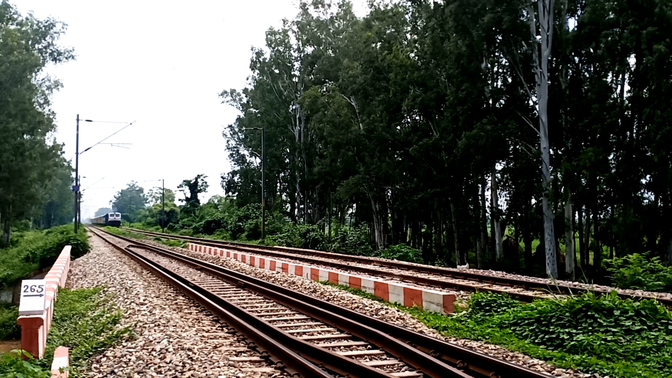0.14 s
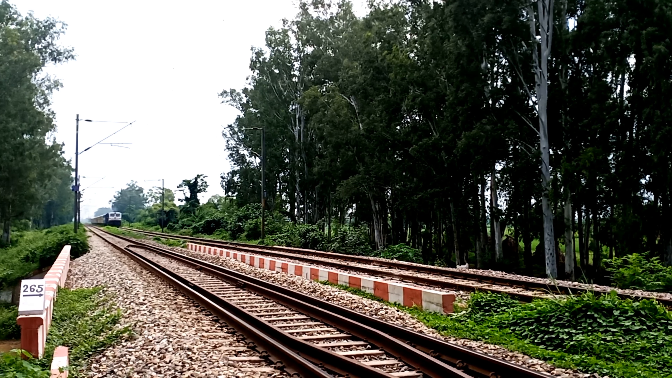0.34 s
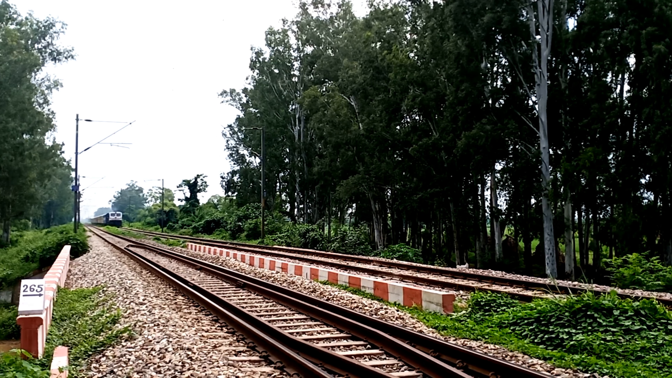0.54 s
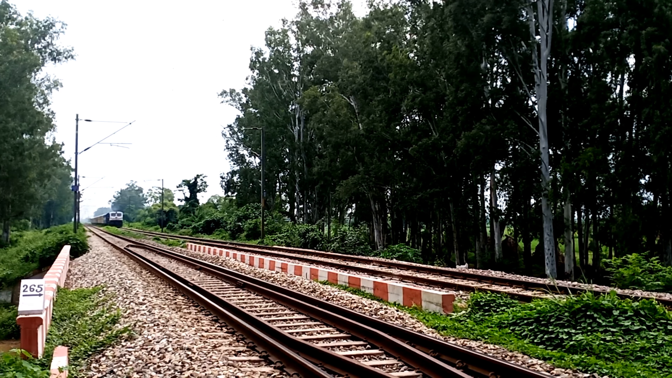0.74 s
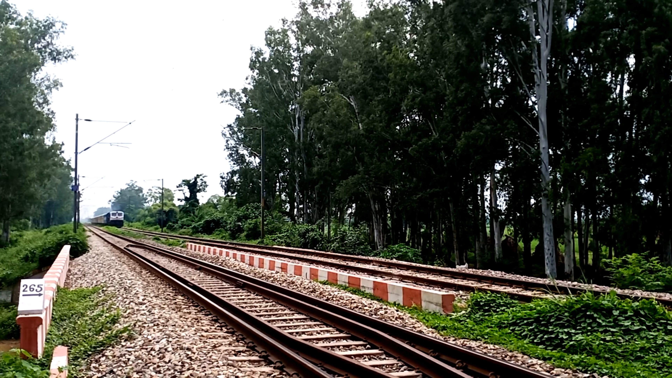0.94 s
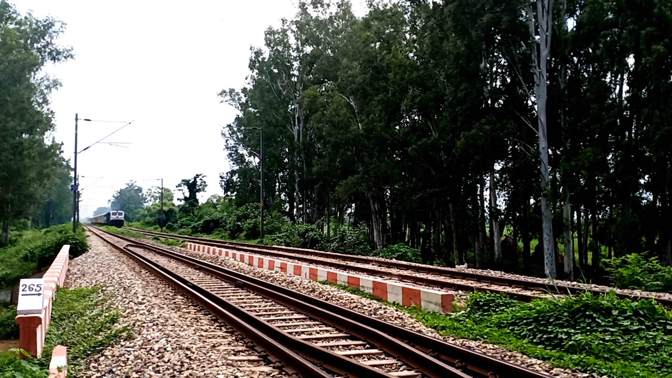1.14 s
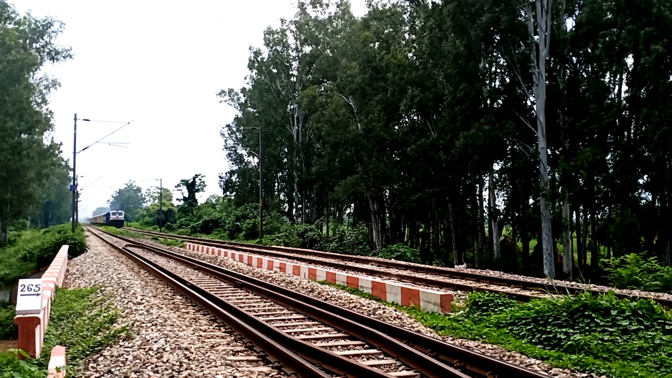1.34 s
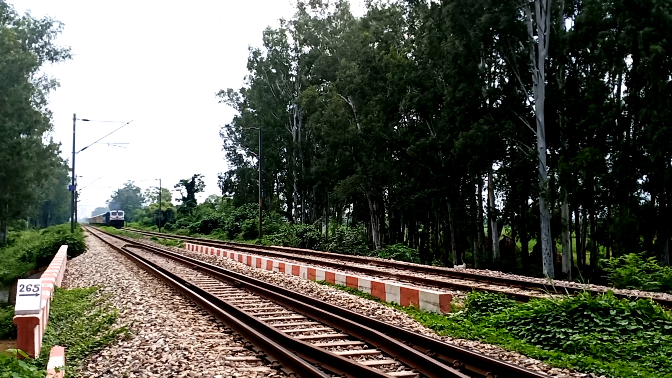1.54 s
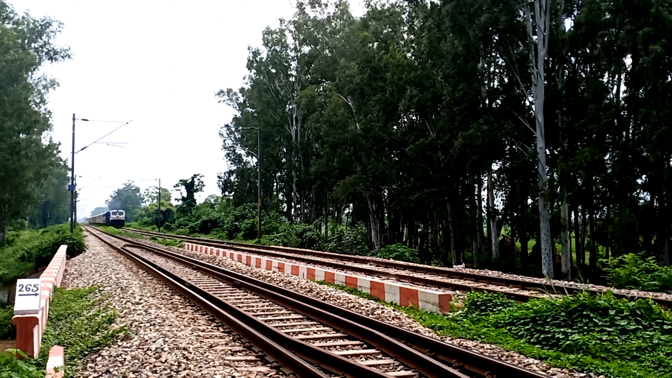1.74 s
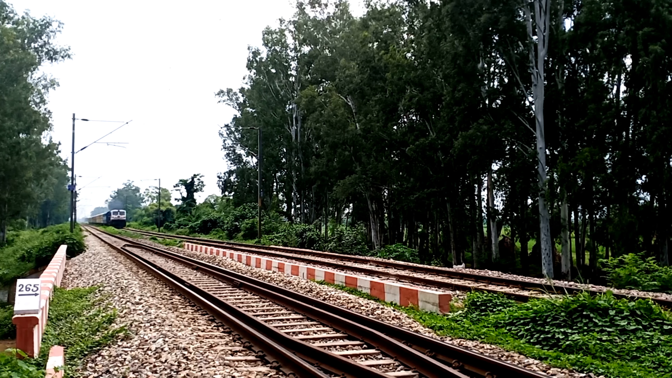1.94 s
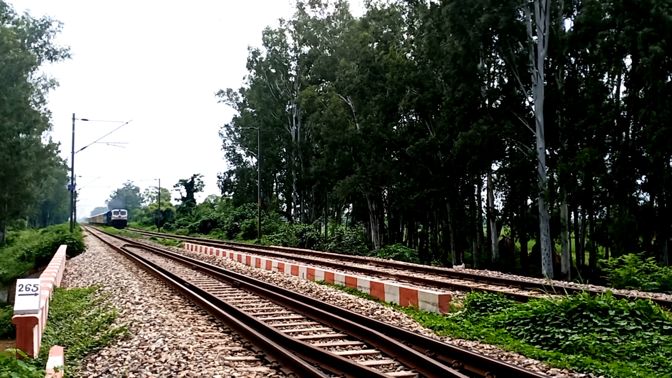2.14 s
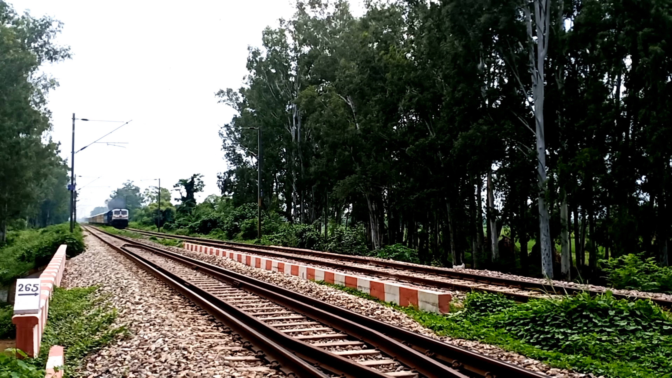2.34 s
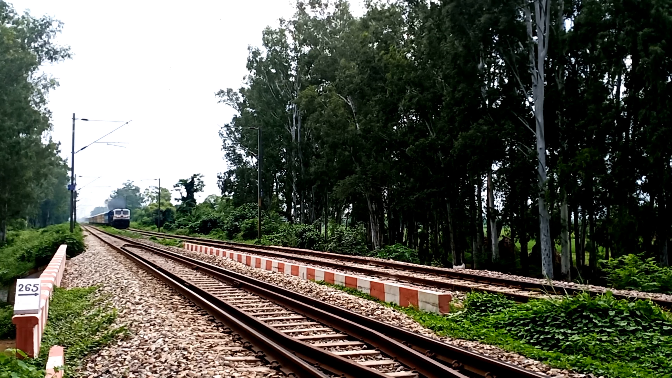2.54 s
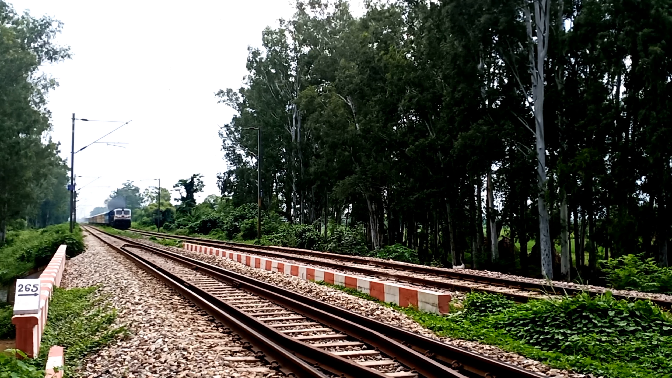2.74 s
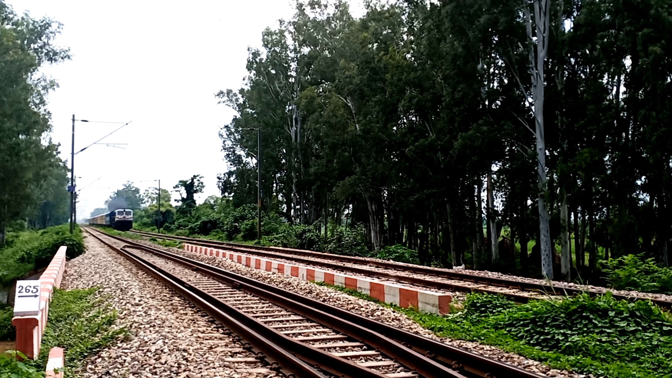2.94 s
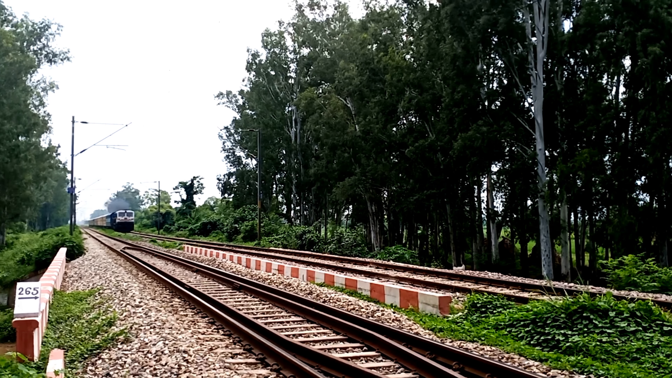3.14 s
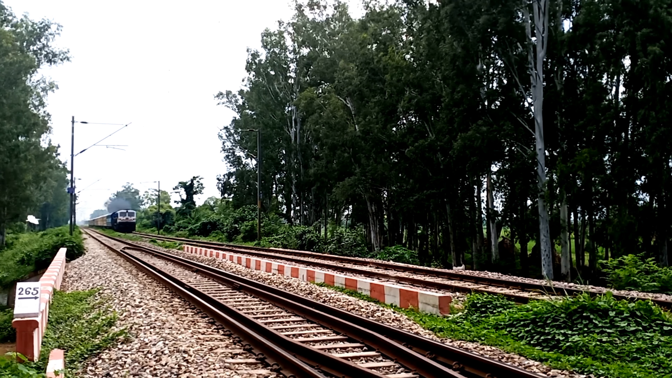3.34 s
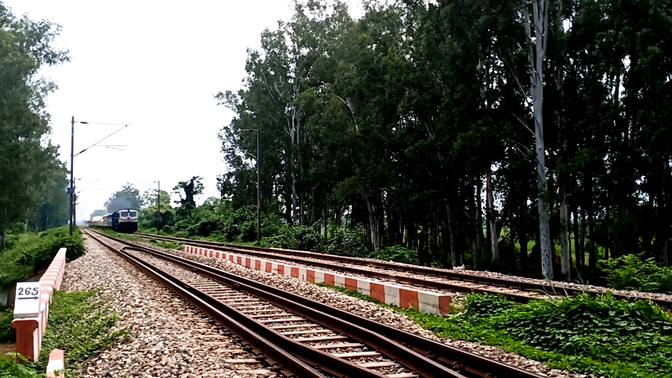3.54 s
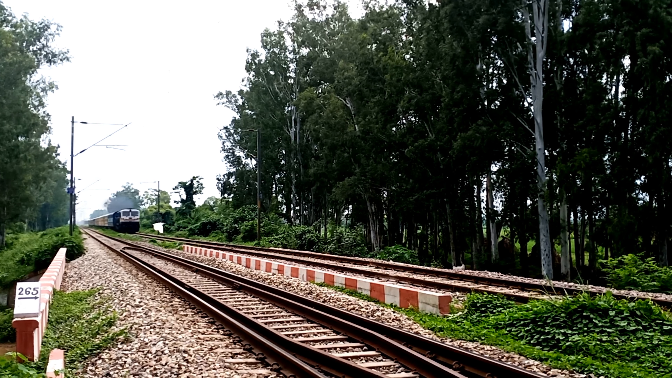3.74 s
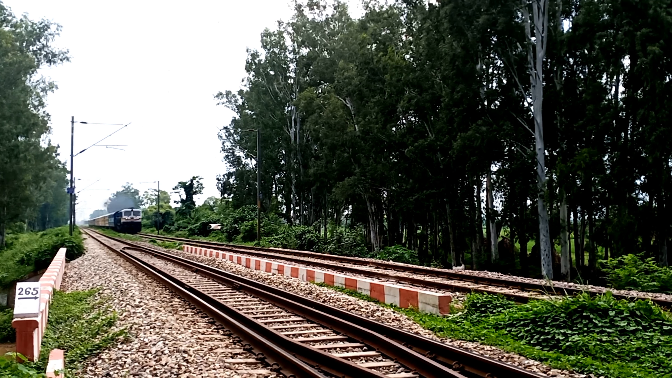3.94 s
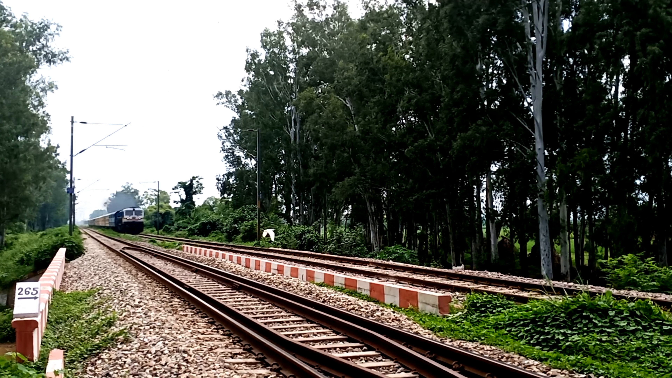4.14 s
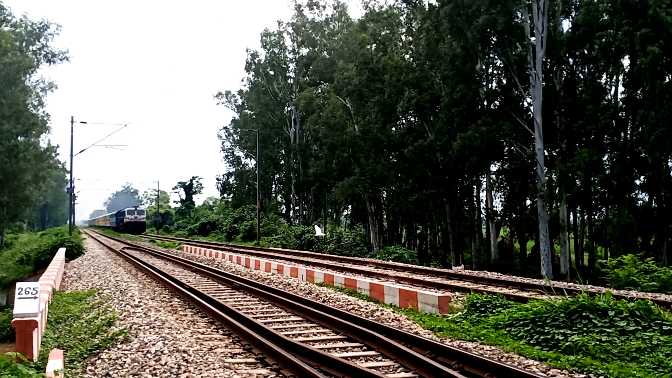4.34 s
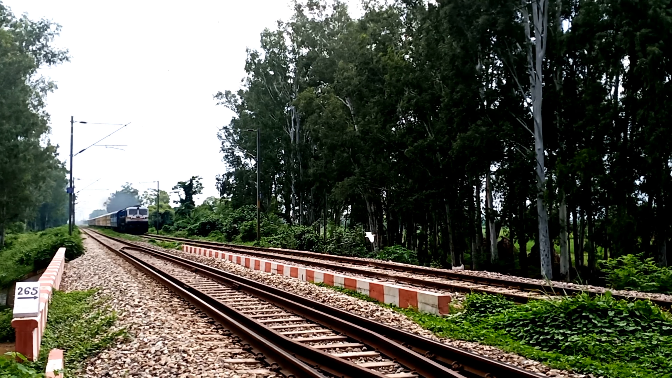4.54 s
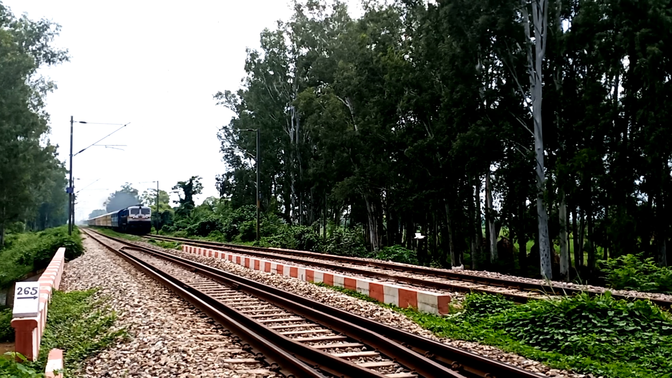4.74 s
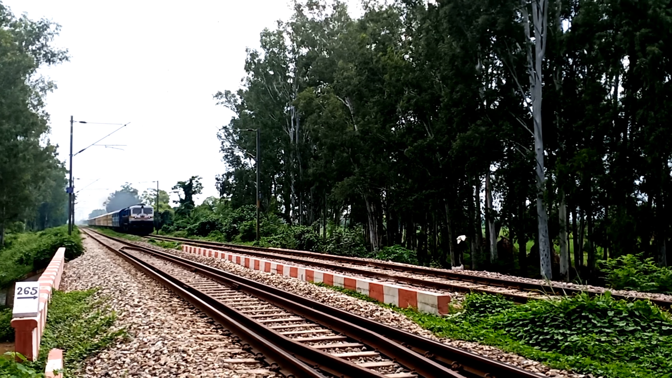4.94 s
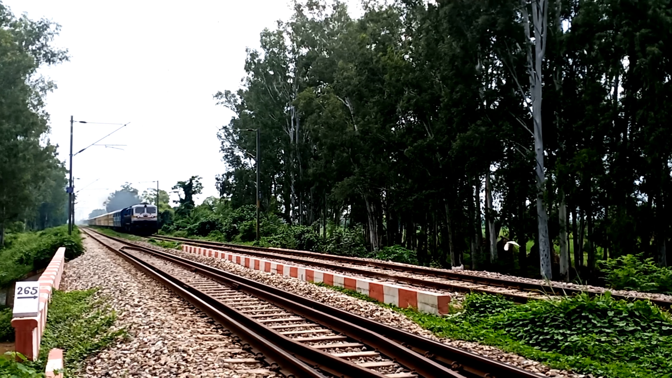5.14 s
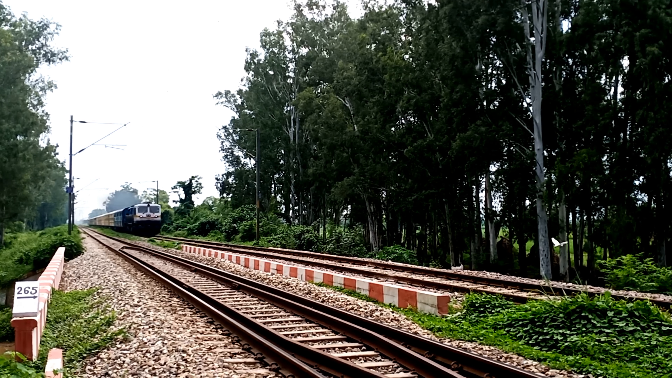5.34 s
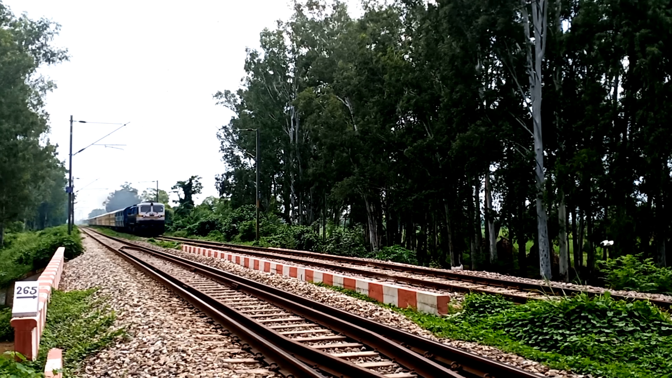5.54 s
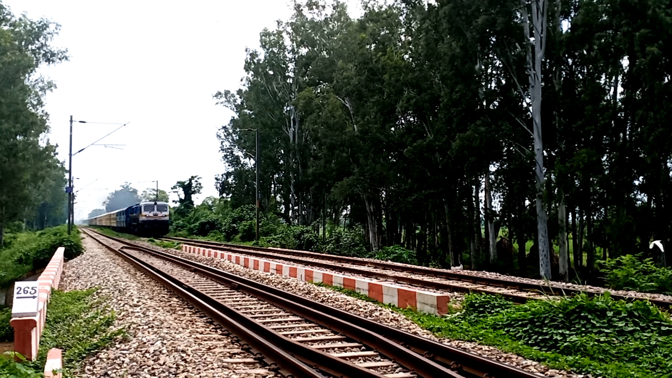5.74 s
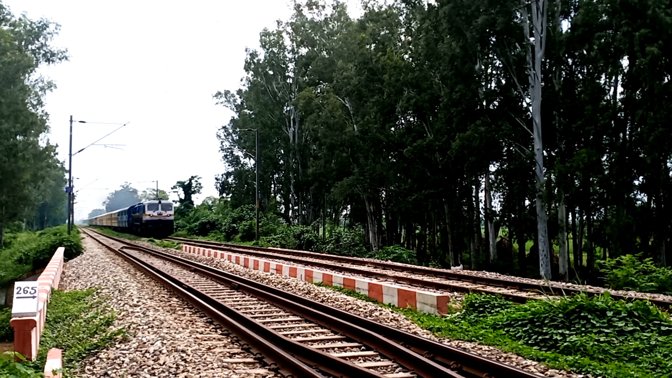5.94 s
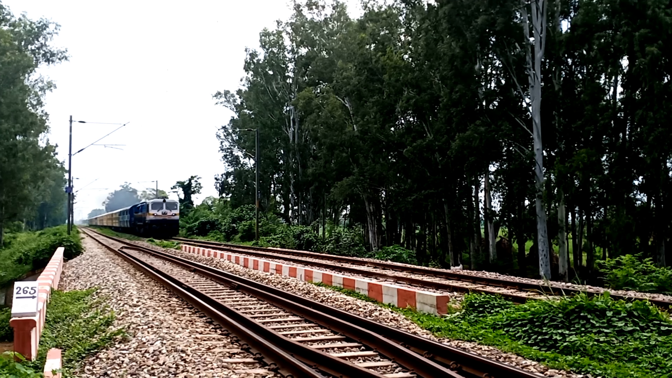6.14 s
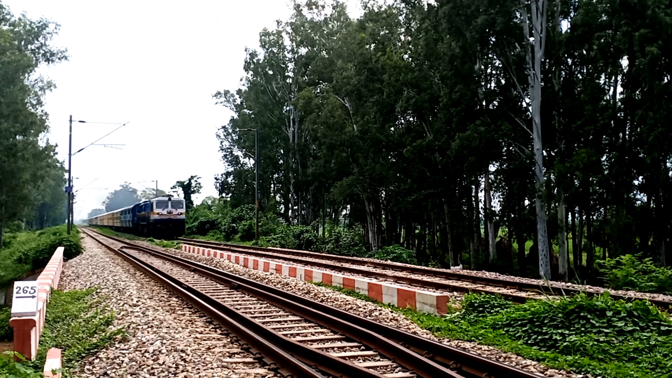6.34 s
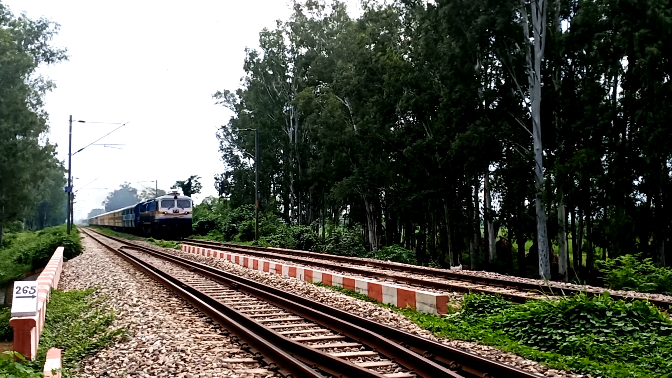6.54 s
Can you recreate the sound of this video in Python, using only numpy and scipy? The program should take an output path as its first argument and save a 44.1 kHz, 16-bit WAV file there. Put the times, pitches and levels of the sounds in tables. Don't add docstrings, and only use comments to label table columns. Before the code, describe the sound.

Faint rumble, thin rail whistles and soft insects give way to a piercing flange squeal and the growing roar of an oncoming diesel locomotive.

```python
import sys
import numpy as np
from scipy import signal
from scipy.io import wavfile
from scipy.ndimage import uniform_filter1d

SR = 44100
rng = np.random.default_rng(int(sys.argv[2]) if len(sys.argv) > 2 else 0)


def wav_record(signal):
    frames = np.transpose(np.atleast_2d(signal))
    bounded = np.clip(frames, -1, 1)
    quanta = np.round(bounded * 32767).astype(np.int16)
    wavfile.write(sys.argv[1], SR, quanta)


def makeup_ratio(level_db):
    decades = np.asarray(level_db, float) / 20
    return 10 ** decades


N = 291060
T = np.arange(N) / SR

# (time [s], level against that at 4.9 s [dB])
NEARNESS = [(0, -24), (.66, -22.5), (1.1, -19), (1.45, -18.5), (1.6, -17), (2.2, -12.5), (2.6, -7),
            (3.3, -5), (4.0, -2), (4.9, 0), (5.5, 1.5), (6.3, 3.5), (6.6, 4)]


def evened(x):
    return x / np.sqrt(np.mean(abs(x) ** 2, -1, keepdims=True) + 1e-20)


def columns(rows, t):
    s, *values = np.transpose(rows)
    return np.array([np.interp(t, s, v) for v in values])


def read(points, hz):
    f, *values = np.transpose(points)
    return np.array([np.interp(np.log(hz + 1), np.log(f + 1), v) for v in values])


def sides(pan_db):
    return makeup_ratio(np.array([[pan_db / 2], [-pan_db / 2]]))


def flutter(length, width_hz, same, order=2):
    a, b, c, d = rng.standard_normal((length + 4000, 4)).T
    same = np.clip(same, 0, 1)
    left = a + 1j * b
    z = np.array([left, same * left + np.sqrt(1 - same ** 2) * (c + 1j * d)])
    pole = np.exp(-np.pi * width_hz / SR)
    for _ in range(order):
        z = signal.lfilter([1 - pole], [1, -pole], z)
    return evened(z[:, 4000:])


def turning(hz):
    return np.exp(2j * np.pi * np.cumsum(hz) / SR)


def drift(rate_hz):
    speeds = np.geomspace(.3, rate_hz, num=8)[:, None]
    coarse = T[::441]
    swing = np.sin(2 * np.pi * (speeds * coarse + rng.random((8, 1)))).sum(0) / 2
    return np.interp(T, coarse, swing)


def swells(rows, t):
    coarse = t[::88]
    bells = sum(db * np.exp(-abs((coarse - s) / half_s) ** 3.7) for s, half_s, db in rows)
    return np.interp(t, coarse, bells + 0 * coarse)


def layers_db():
    # (level against the near spectra [dB], growth [dB per dB of nearness], random swing [dB])
    layers = [
        (-7.5, 0.55, 1),
        (2.5, .7, 2.17),
        (2.5, 1.37, 0.8),
        (0, 1.13, 0.33),
    ]
    # (middle [s], half length [s], level [dB])
    gusts = [
        [(.8, .12, -8.5), (1.14, 0.072, 6), (1.55, 0.13, 3.5), (2.65, 0.18, -1), (4.9, 0.11, 4),
         (2.12, 0.2, -8.5), (3.58, .04, -11), (4.37, .12, 2), (4.63, .08, -2)],
        [(2.81, 0.1, 11), (2.7, 0.052, 5), (3.1, .03, 3.5), (2.1, 0.24, -6.5), (4, 0.34, 2.5), (4.7, 0.063, -5),
         (2.1, .12, -3.5)],
        [(.45, .35, 7.5), (.97, 0.075, -4), (2.61, 0.034, 2), (3.23, 0.02, 6), (3.5, .12, -3)],
        [],
    ]
    near_db = columns(NEARNESS, T)[0]
    out = []
    for (db, growth, swing_db), layer_gusts in zip(layers, gusts):
        swing = swing_db * (1 - near_db / 30) * drift(rate_hz=7.)
        out.append(db + growth * near_db + swells(layer_gusts, T) + swing)
    out = np.array(out)
    screen_db, clear_s, clearing_s = -12, 3.25, 0.12
    out[1] += screen_db / 2 * (1 - np.tanh((T - clear_s) / clearing_s))
    return out


def exhaust(noise_db):
    # (time [s], speed [turns per second])
    crank = [(0.0, 16.85), (0.55, 16.84), (1.1, 16.88), (1.65, 16.63), (2.2, 16.55), (2.75, 16.61),
             (3.3, 16.81), (3.85, 17.0), (4.4, 17.03), (4.95, 16.98), (5.5, 16.77), (6.05, 16.84),
             (6.6, 16.81)]
    main_orders = (8, 9, 10, 13)
    # (multiple of crank speed, level against the noise layer they ride on [dB])
    weak_orders = [(3, -16), (4, 5), (5, 4.5), (6, 5.5), (7, -0.5), (11, 4.5), (12, -15), (14, -36),
                   (15, -6), (16, -6.5), (17, -1), (18, 4.5), (19, -27), (20, -8), (22, -2), (23, -5),
                   (25, 2.5)]
    # (middle [s], half length [s], level [dB])
    fades = [
        [(.48, 0.44, -19), (1.98, 0.31, -28), (2.96, 0.34, -11.5), (4.5, 0.28, -12.5), (4.5, .07, -24),
         (5.37, 0.17, -3.5), (5.82, 0.19, -6.5), (6.14, 0.068, -17)],
        [(.08, 0.11, -8), (.86, .22, -10), (2.08, 0.255, -22), (2.55, 0.12, -5), (2.98, 0.26, -16),
         (3.68, 0.11, -8), (4.52, 0.11, -8.5), (5.05, 0.17, -1), (5.7, 0.092, -28.5), (5.9, 0.23, -12),
         (6.27, 0.038, -5), (6.47, 0.084, -3.5)],
        [(.72, 0.35, -15), (1.9, 0.46, -18), (3.1, 0.45, -10.5), (4.27, 0.17, -15), (4.95, 0.47, -10),
         (5.8, 0.22, -9)],
        [(3.7, 0.13, 17.5), (5.1, 0.081, 13), (5.55, .13, 15.5), (6.3, 0.52, 11.5)],
    ]
    main_orders_db = (-25, -31, -33.5, -54.5)
    growth = 0.78
    turns = np.cumsum(columns(crank, T)[0]) / SR - .2
    rumble_db = noise_db[0] - 30.5
    body_db = 1.15 * noise_db[1] - 42.5
    near_db = columns(NEARNESS, T)[0]
    levels = []
    for order, db, order_fades in zip(main_orders, main_orders_db, fades):
        levels.append((order, db + growth * near_db + swells(order_fades, T) + 1.1 * drift(rate_hz=9.)))
    for order, db in weak_orders:
        carrier_db = rumble_db if order < 8 else body_db
        levels.append((round(order), db - 14.0 + carrier_db + 3.8 * drift(rate_hz=6.)))
    tone = 0
    for order, db in levels:
        pipe_lag = np.arctan((order - 8) / 1.2)
        air_lag = (.25 + .2 * abs(order - 9)) * drift(rate_hz=1.5)
        wave = np.cos(2 * np.pi * order * turns - (pipe_lag + air_lag))
        tone = tone + makeup_ratio(db) * np.sqrt(2) * wave
    return tone * sides(1.77)


def roar(noise_db):
    layer_hz = (90, 350, 850, 2600)
    # (frequency [Hz], level [dB per Hz])
    near_left = [(25, -120), (65, -51.5), (140, -53.5), (300, -62), (540, -68.5), (800, -63.5), (1150, -66),
                 (2200, -62), (3100, -63), (4400, -59.5), (6500, -68), (8200, -82.5), (8900, -86),
                 (13600, -86.5), (15600, -70)]
    # (frequency [Hz], level [dB per Hz])
    near_right = [(200, -73.5), (300, -63), (540, -73), (900, -64), (1250, -70), (2300, -65.5),
                  (3500, -69.5), (6000, -74.5), (9800, -78), (10300, -94), (13500, -94), (15600, -88)]
    # (frequency [Hz], left [dB per dB], right [dB per dB])
    range_growth = [(200, 0.9, 1.14), (630, 1.28, 1.14), (900, 0.5, 1.14), (1150, 1.27, 1.1),
                    (1420, 0.77, 1.27), (2050, 1.05, 1.1), (2750, 1.1, 1.46), (4140, 0.86, 1.37),
                    (6670, 0.98, 1.35), (9050, 1.57, 1.5), (15200, 2, 2.2)]
    # (frequency [Hz], likeness [-1 to 1])
    coherence = [(60, 0.98), (130, 0.83), (290, 1), (640, 0.67), (1410, -0.22), (3100, 0.19),
                 (6820, 0.0014), (15000, 0.31)]
    # (frequency [Hz], width [Hz], level [dB])
    body_rings = [
        (719, 64, 8),
        (976, 114, 9),
        (1420, 93, 4.5),
        (2260, 250, 4),
    ]
    frames = N // 256 + 5
    hz = np.fft.rfftfreq(1024, 1 / SR)
    t = np.arange(frames) * 256 / SR
    a, b, c, d, patches, flicker, wisps = rng.standard_normal((frames, 513, 7)).T
    wisps = evened(uniform_filter1d(uniform_filter1d(wisps, size=3, axis=0), size=30, axis=1))
    patches = evened(uniform_filter1d(uniform_filter1d(patches, size=12, axis=0), size=14, axis=1))
    flicker = evened(uniform_filter1d(uniform_filter1d(flicker, size=90, axis=0), size=4, axis=1))

    change_db = np.array([np.interp(t, T, db) for db in noise_db])
    change_db = np.array([np.interp(np.log(hz + 1), np.log(layer_hz), c_db) for c_db in change_db.T]).T
    mottle_db = np.clip(-change_db / 7, .6, 3) * wisps
    near_db = np.vstack([read(near_left, hz), read(near_right, hz)])
    near_db[1, hz < 200] = near_db[0, hz < 200] - 1.5
    near_db = near_db + sum(db / (1 + (2 * (hz - f) / width) ** 2) for f, width, db in body_rings)

    same = np.clip(read(coherence, hz)[0], -1, 1)[:, None]
    left = a + 1j * b
    z = np.array([left, same * left + np.sqrt(1 - same ** 2) * (c + 1j * d)])
    growth_db = read(range_growth, hz)[..., None] * change_db
    z *= makeup_ratio(near_db[..., None] + growth_db + 0.91 * patches + 0.41 * flicker + mottle_db)
    return signal.istft(z, nperseg=1024, noverlap=768)[1][:, :N] * np.sqrt(SR / 1024)


def whines():
    # (time [s], low whine [Hz], middle whine [Hz], high whine [Hz])
    whine_hz = [(0, 798, 947, 1410), (.5, 781.5, 972, 1412), (2.2, 780, 968, 1420), (3.3, 792, 983, 1415),
                (4.4, 805, 989, 1396), (5.5, 793, 999, 1415), (6.6, 788, 995, 1405)]
    # (rms when near [dB], growth [dB per dB of nearness])
    whine_levels = [
        (-37, 1.03),
        (-45.5, 1.07),
        (-49.5, 0.5),
    ]
    # (middle [s], half length [s], level [dB])
    whine_swells = [
        [(.42, 0.21, 13), (.98, .07, -17), (1.15, 0.049, 10), (1.36, .05, -6), (2.55, 0.063, 5.5),
         (3.23, 0.069, 6.5), (3.5, .12, -8), (5.55, 0.095, -1.5), (6.25, 0.17, -5)],
        [(.27, .07, 17), (1.3, 0.11, 3), (3.4, 0.17, 3), (5.07, 0.073, 6), (6.1, 0.64, 7.5)],
        [(.45, 0.83, 9.5), (1.7, .45, -2), (2.77, .12, 6), (6.23, .12, -10)],
    ]
    widths_hz, pans_db, likeness = (42, 6, 60), (3.5, .6, 3.), (.9, .85, .1)
    near_db = columns(NEARNESS, T)[0]
    levels_db = [db + growth * near_db + swells(rows, T) + 1.2 * drift(rate_hz=5.)
                 for (db, growth), rows in zip(whine_levels, whine_swells)]
    out = np.zeros((2, N))
    for db, hz, width, pan, same in zip(levels_db, columns(whine_hz, T), widths_hz, pans_db, likeness):
        wobble = 7.2 / width + flutter(N, width, same)
        out += makeup_ratio(db + 1.5) * (evened(wobble) * turning(hz)).real * sides(pan)
    return out


def insects():
    # (frequency [Hz], width [Hz], level [dB], left minus right [dB], throbs [per second])
    choruses = [
        (5270, 350, -62.5, 0.5, 12),
        (9320, 630, -75, -15.5, 55),
    ]
    out = np.zeros((2, N))
    for hz, width_hz, db, pan_db, throbs_hz in choruses:
        throb = 1 + 0.14 * np.sin(2 * np.pi * throbs_hz * T + 2. * drift(rate_hz=1.4))
        song = (flutter(N, width_hz, 0.11) * turning(np.full(N, hz))).real
        out += 2 * makeup_ratio(db) * throb * song * sides(pan_db)
    return out


def squeaks():
    # (frequency [Hz], width [Hz], left minus right [dB])
    rail_modes = [(2490, 69, -7), (2860, 95, 3), (3120, 800, 12), (3210, 63, 3), (3390, 90, 7.5),
                  (3760, 73, 13), (7090, 150, 2), (7240, 180, 2), (7400, 180, -2), (11450, 370, 4)]
    # (start [s], end [s], level [dB])
    mode_squeaks = [
        [(.415, .62, -57.5), (.62, .86, -59)],
        [(.42, .56, -63), (.6, .9, -70), (.93, 1.3, -66)],
        [(0.654, .95, -59)],
        [(0.429, 1.12, -53.5)],
        [(.21, .36, -66), (.665, .92, -55), (1.11, 1.24, -60), (1.19, 1.4, -63), (1.97, 2.45, -55.5)],
        [(0.0062, .25, -68)],
        [(.21, .4, -63.5), (1.19, 1.37, -69)],
        [(1.76, 1.93, -67)],
        [(1.433, 1.65, -70)],
        [(1.409, 2.296, -72.5)],
    ]
    out = np.zeros((2, N))
    rows = [(*row, *mode) for mode, squeaks_here in zip(rail_modes, mode_squeaks) for row in squeaks_here]
    for start_s, end_s, db, hz, width_hz, pan_db in rows:
        start, end = max(round(start_s * SR), 0), round(end_s * SR)
        length = end - start
        share = np.linspace(0, 1, length)
        shape = np.minimum(share * length / 900, 1) * (1 - share ** 2.7)
        fuzz = evened(24.0 / width_hz + flutter(length, width_hz, 0.16))
        ring = fuzz * turning(np.full(length, hz))
        out[:, start:end] += 2.43 * makeup_ratio(db) * ring.real * shape * sides(pan_db)
    return out


def squeal_db(t):
    # (middle [s], half length [s], level [dB])
    grips = [(2.15, .025, 1.5), (3.18, 0.059, 1), (2.303, 0.012, 7.5), (2.34, 0.011, -13),
             (2.48, 0.011, -8), (2.555, 0.017, 4.5), (2.8, .016, -9), (2.83, 0.015, 2), (3.0, 0.016, -3),
             (3.034, 0.015, 7.5), (3.122, 0.013, -2), (3.293, 0.0087, -7), (3.335, .022, 2),
             (3.385, 0.022, -9.5), (3.418, 0.012, 2)]
    top_db, top_s, bite_s, let_go_s = -28.5, 2.466, 2.15, 2.99
    bite, swell, sag, let_go = 203, 18.5, 9.5, 32
    db = top_db - swell * np.maximum(top_s - t, 0) - sag * np.maximum(t - top_s, 0)
    db = db - bite * np.maximum(bite_s - t, 0) - let_go * np.maximum(t - let_go_s, 0)
    db = db + swells(grips, t)
    return db, db - 9 + 15 * (t - top_s)


def squeal():
    # (time [s], frequency [Hz], split [Hz])
    glide = [(2.04, 5045, 0), (2.2, 5065, 30), (2.45, 5085, 35), (2.75, 5120, 28), (3.05, 5148, 15),
             (3.5, 5165, 15)]
    overtones_db = (-18, -27.5)
    steady_hz = 5220
    start, end = round(2.04 * SR), round(3.5 * SR)
    t = T[start:end]
    rising_db, steady_db = squeal_db(t)
    steady_db = steady_db - 30 * np.clip((2.435 - t) / .03, 0, 1)
    rising_db = np.maximum(rising_db, -43 - 250 * abs(t - 2.09))
    hz, split_hz = columns(glide, t)
    strands = [(rising_db - 3.0, hz - split_hz),
               (rising_db - 5.0, hz + split_hz),
               (steady_db, steady_hz + 0 * hz)]
    z = 0
    for db, pitch in strands:
        z = z + makeup_ratio(db) * evened(.3 + flutter(end - start, 55, 0, order=4)) * turning(pitch)
    pointer = z / (abs(z) + 0.0014)
    swing = z * sides(4.2)
    swing += makeup_ratio(overtones_db[0]) * z * pointer * sides(.6)
    swing += makeup_ratio(overtones_db[1]) * z * pointer ** 2 * sides(17.0)
    out = np.zeros((2, N))
    out[:, start:end] = 1.8 * swing.real * signal.windows.tukey(end - start, .03)
    return out


def scene():
    noise_db = layers_db()
    left, right = exhaust(noise_db) + roar(noise_db) + whines()
    left_lag = 4
    train = np.array([np.pad(left, (left_lag, 0))[:N], right])
    return train + squeal() + squeaks() + insects()


def drop_masked(x):
    # (frequency [Hz], quietest kept level [dB per Hz], masking against the 3-7 kHz level [dB])
    thresholds = [(3000, -110, -45), (6000, -106, -38), (7900, -103, -27), (8600, -107, -20),
                  (10000, -105, -20), (10500, -99, -21), (12600, -98, -23), (14200, -91, -15),
                  (15200, -101, -28)]
    hz, _, z = signal.stft(x, SR, nperseg=2048, noverlap=1024, scaling="psd")
    bands = (abs(z[:, :1024]) ** 2).reshape(2, 128, 8, -1).mean(2)
    level_db = 10 * np.log10(2 * uniform_filter1d(bands, size=3, axis=2) + 1e-20)
    hiss_db = np.median(level_db[:, 18:40], axis=1, keepdims=True)
    quiet_db, under_db = read(thresholds, hz[4:1024:8])[..., None]
    chance_db = 6 * uniform_filter1d(rng.standard_normal(level_db.shape), size=3, axis=2)
    heard = level_db > np.maximum(quiet_db, hiss_db + under_db) + chance_db
    z[:, :1024] *= np.repeat(heard, 8, 1)
    return signal.istft(z, SR, nperseg=2048, noverlap=1024, scaling="psd")[1][:, :N]


def band_limit(x):
    return signal.sosfilt(signal.butter(12, 17130, fs=SR, output="sos"), x)


def record(dry):
    hiss = makeup_ratio([[-82], [-95]]) * rng.standard_normal((N, 2)).T
    kept = drop_masked(dry) + hiss
    edge = signal.firwin(511, 15780, window=("kaiser", 9), fs=SR)
    mix = signal.oaconvolve(kept, edge[None], "same")
    return band_limit(mix)


dry = scene()
out = record(dry)
wav_record(out)
```